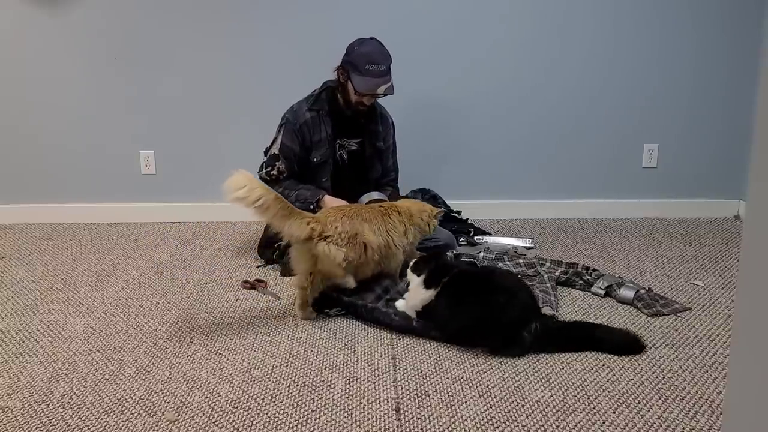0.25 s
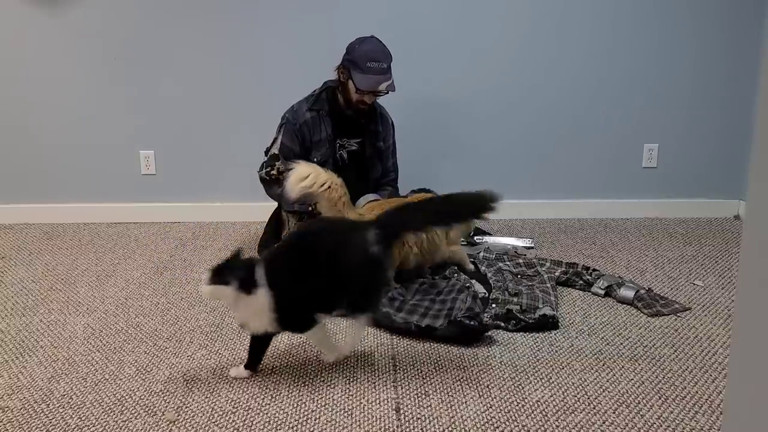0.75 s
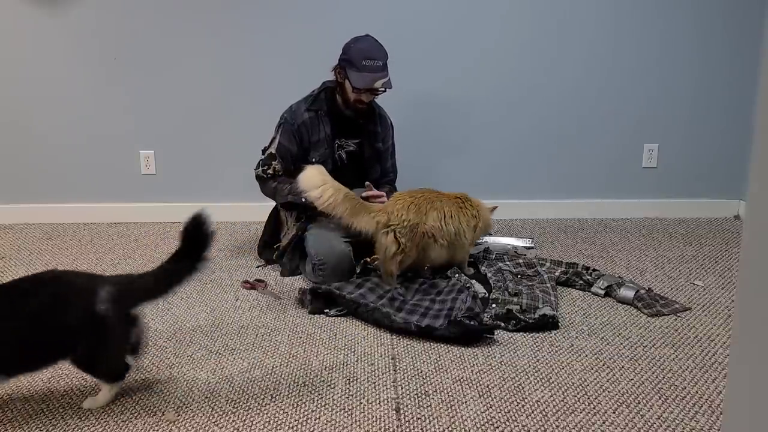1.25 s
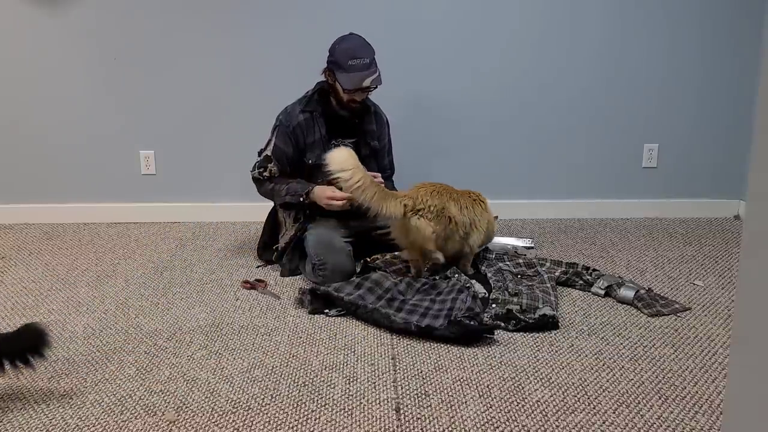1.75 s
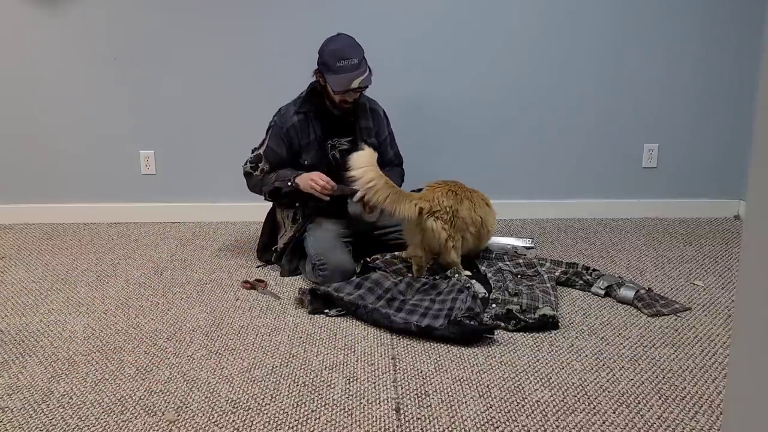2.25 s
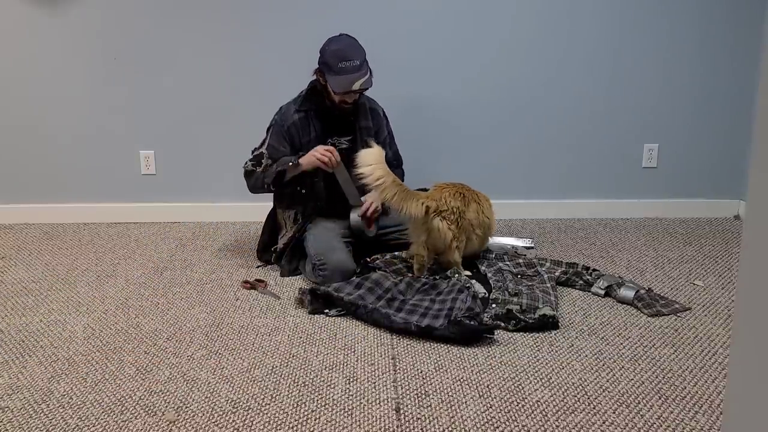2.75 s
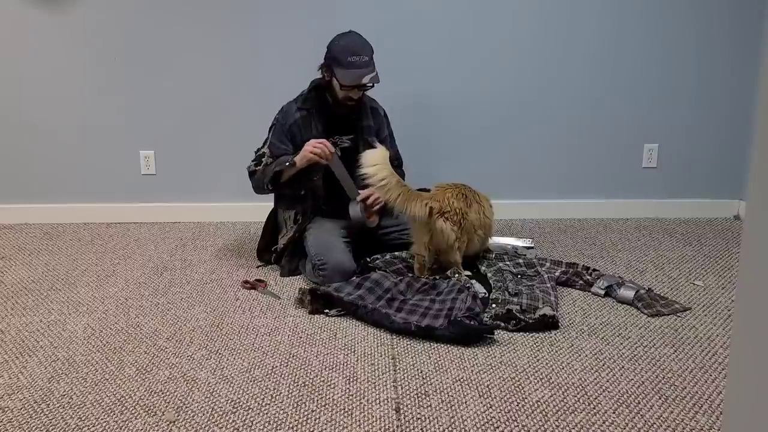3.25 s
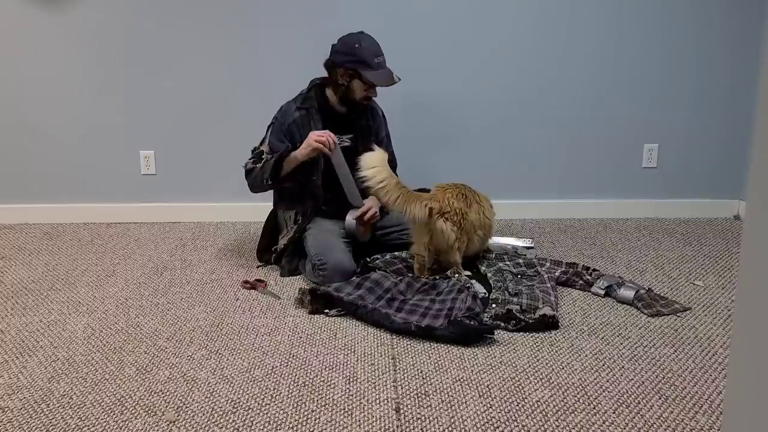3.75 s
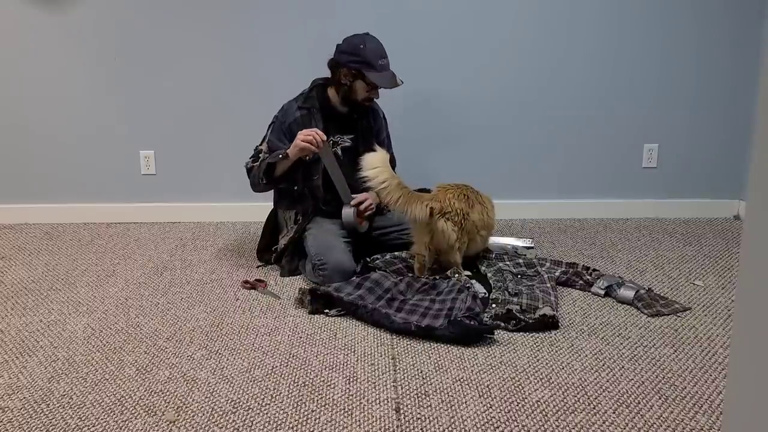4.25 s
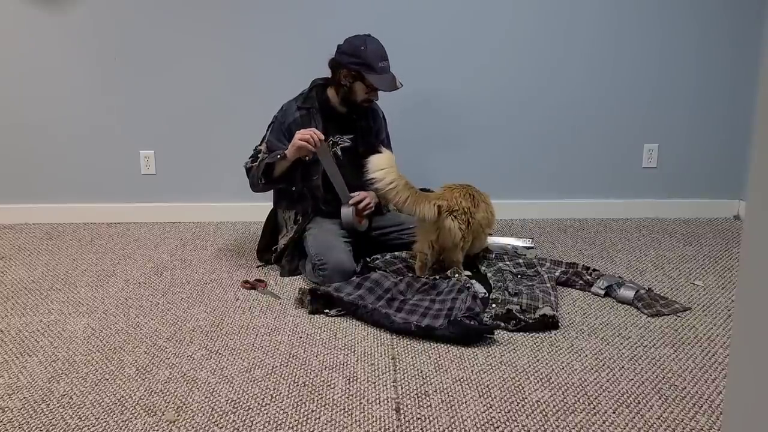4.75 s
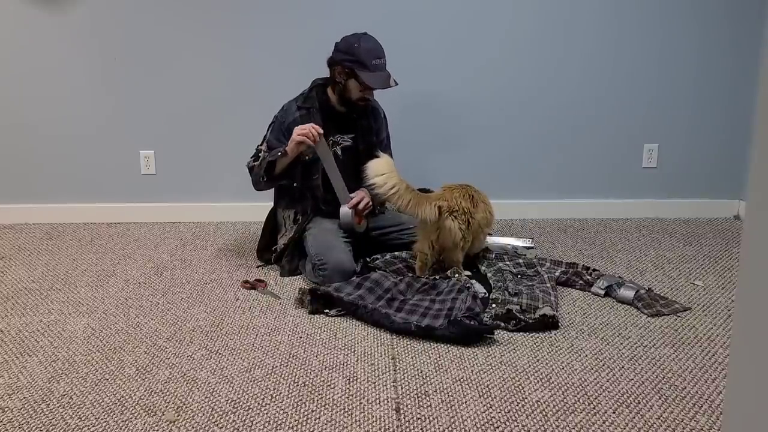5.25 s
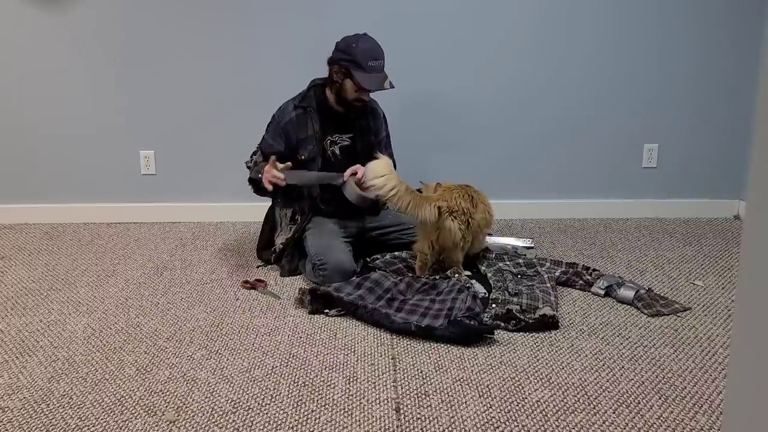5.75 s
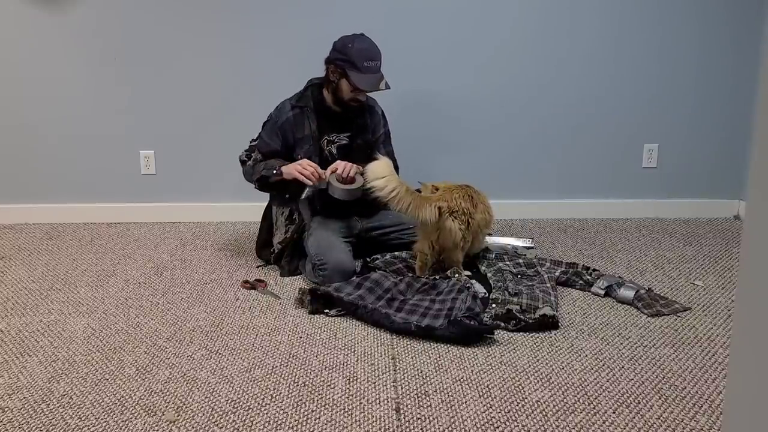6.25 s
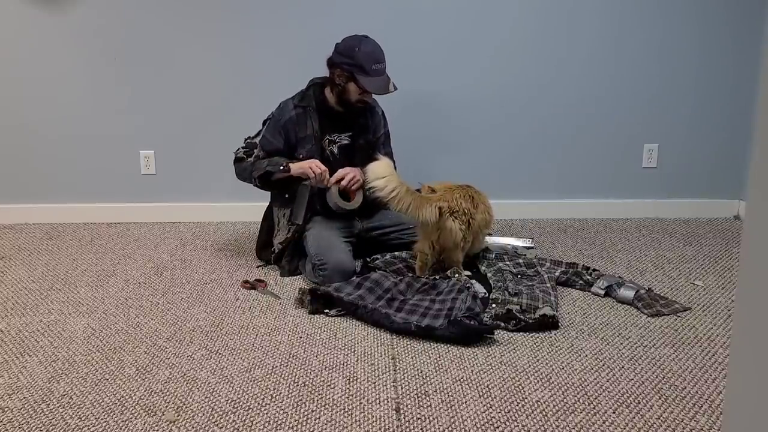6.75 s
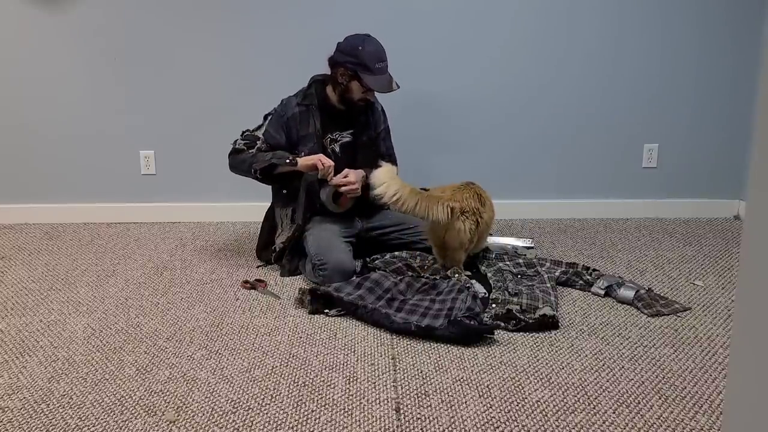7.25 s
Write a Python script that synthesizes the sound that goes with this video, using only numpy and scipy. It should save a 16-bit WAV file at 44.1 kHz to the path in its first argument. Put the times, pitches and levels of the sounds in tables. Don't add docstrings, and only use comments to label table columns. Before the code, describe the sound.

A roll of sticky cloth tape is worked loose a few metres from a stereo microphone in a small carpeted room. One loud snap comes early, then clusters of ticks, short low buzzes and drumming of the strip, another hard snap, a long quiet stretch with faint clicks, and a bright squealing rip at the very end. Mains hum and soft duct air continue beneath.

```python
import sys
import numpy as np
from scipy import signal
from scipy.fft import rfft, irfft, next_fast_len
from scipy.io import wavfile
from scipy.ndimage import uniform_filter1d

SR = 44100
rng = np.random.default_rng(int(sys.argv[2]) if len(sys.argv) > 2 else 0)


def attenuation_scalar(level_db):
    decades = np.asarray(level_db, float) / 20
    return 10 ** decades


def master(y):
    cut = np.clip(np.atleast_2d(y).T, -1, 1)
    pcm = np.round(cut * 32767)
    wavfile.write(sys.argv[1], SR, pcm.astype(np.int16))


N = 330109
T = np.arange(N) / SR
FFT_LEN = next_fast_len(N + N % 2, True)
FFT_HZ = np.maximum(np.fft.rfftfreq(FFT_LEN, 1 / SR), 1)


def on_log(table, hz, col=1):
    table = np.array(table, float)
    return np.interp(np.log(hz), np.log(table[:, 0]), table[:, col])


def ring(x, hz, width_hz):
    return signal.lfilter(*signal.iirpeak(hz, hz / width_hz, fs=SR), x)


def walk(rate_hz):
    hold = int(SR / rate_hz)
    steps = np.repeat(rng.standard_normal(N // hold + 1), hold)
    drift = uniform_filter1d(uniform_filter1d(steps, hold), hold)[:N]
    return drift / drift.std()


def bumps(rows):
    return sum(db * np.exp(-((T - s) / half_s) ** 4) for s, db, half_s in rows)


def pull(t, swell_s, fade_s):
    return np.where(t < swell_s, np.abs(t / swell_s) ** 1.3, np.exp(-(t - swell_s) / fade_s))


def diffuse(count):
    hz = np.fft.rfftfreq(count, 1 / SR)
    alike = .97 * np.exp(-(hz / 607) ** 2)
    mid, side = rfft(rng.standard_normal((2, count))) * np.sqrt([(1 + alike) / 2, (1 - alike) / 2])
    return np.array([mid + side, mid - side])


# frequency in Hz, density in dB per Hz.
AIR_SPECTRUM = [(25, -28), (50, 0.5), (70, 3), (160, 2), (300, -5.5), (800, -11.5), (950, -14), (1300, -12),
                (2200, -19), (3200, -18.5), (4500, -27.5), (5300, -34.5), (8000, -42.5), (16000, -38.5)]
# frequency in Hz, width in Hz, rise in dB.
DUCT_RINGS = [(210, 48, -8), (278, 31, 4), (499, 29, 4), (755.6, 32, 10.5), (7000, 1800, 5)]


def air():
    level_db = -59
    rings_db = sum(db / (1 + (2 * (FFT_HZ - hz) / width_hz) ** 2) for hz, width_hz, db in DUCT_RINGS)
    noise = diffuse(FFT_LEN) * attenuation_scalar(on_log(AIR_SPECTRUM, FFT_HZ) + rings_db)
    swell, out = walk(1.0), 0
    for lo_hz, hi_hz in [(0, 250), (250, 700), (700, 2500), (2500, SR)]:
        band = irfft(noise * ((FFT_HZ >= lo_hz) & (FFT_HZ < hi_hz)), FFT_LEN)[:, :N]
        out = out + band * attenuation_scalar(.5 * swell + 0.5 * walk(3.94))
    return out * attenuation_scalar(level_db) / out.std()


# centre in seconds, depth in dB, half length in seconds.
HUM_DIPS = [
    (2.73, -14, .03),
    (3.81, -6, .05),
    (5.77, -2, 0.025),
]


def hum():
    level_db, waver_db, mains_hz = -57, .5, 119.95
    return attenuation_scalar(level_db + waver_db * walk(3.01) + bumps(HUM_DIPS)) * np.sin(2 * np.pi * mains_hz * T)


# centre in seconds, rise in dB, half length in seconds.
DUCT_SWELLS = [
    (0, 8, 0.35),
    (1.65, 13, .33),
    (4.16, 15, .08),
    (7.25, 15, 0.21),
]


def duct():
    level_db, tone_hz, wander_hz = -78.5, 353, 2.44
    phase = 2 * np.pi * np.cumsum(tone_hz + wander_hz * walk(6)) / SR
    return attenuation_scalar(level_db + bumps(DUCT_SWELLS)) * np.sin(phase)


# frequency in Hz, level in dB.
WHINE = [(14196, -99)]


def whine():
    hz, db = WHINE[0]
    port_phase = np.array([[0], [1.3]])
    return attenuation_scalar(db + 3.0 + .7 * walk(22)) * np.sin(2 * np.pi * hz * T + port_phase)


# centre in seconds, peak in dB, frequency in Hz, swell in seconds.
THUDS = [
    (2.74, -49, 75, 0.017),
    (3.76, -48, 81.5, 0.025),
    (4.22, -60, 70, .05),
    (2.76, -50.5, 200, 0.029),
    (2.84, -55, 177, .04),
    (3.1, -52.5, 191, 0.061),
    (3.8, -53, 241, 0.072),
    (4.08, -61.5, 230, 0.043),
    (5.22, -65, 268, .08),
]


def thuds():
    out = np.zeros(N)
    for s, db, hz, swell_s in THUDS:
        out += attenuation_scalar(db) * np.exp(-((T - s) / swell_s) ** 2) * np.sin(2 * np.pi * hz * (T - s))
    return out


# delay in ms, left level in dB, right level in dB, right lag in ms.
ECHOES = [(0, 0, 0, .09), (1.2, -14, -5, .1), (5.9, -6, -4, .3), (8.6, -11, -11, -.3), (13.2, -8, -1, .1),
          (15.5, -9, -9, -.4), (19.5, -7, -7, .2), (26.5, -10, -9, -.2), (32, -12, -9, .3)]
# frequency in Hz, level in dB, 60 dB decay time in seconds.
ROOM_TAIL = [(100, -34, .4), (220, -31, .38), (400, -23, .38), (800, -25, .3), (1600, -26, .3),
             (3200, -27, .27), (6400, -32, .24), (12800, -29.5, .22)]


def room(count=30000):
    echo_top_hz = 9300
    t, hz = T[:count], np.maximum(np.fft.rfftfreq(count, 1 / SR), 1)
    noise, out = diffuse(count), np.zeros((2, count))
    centres_hz = np.array(ROOM_TAIL)[:, 0]
    for k, (_, db, t60_s) in enumerate(ROOM_TAIL):
        share = on_log(np.c_[centres_hz, np.arange(len(ROOM_TAIL)) == k], hz)
        out += irfft(noise * share, count) * attenuation_scalar(db - 60 * t / t60_s)
    out *= np.clip((t - .004) / .018, 0, 1)
    for ms, left_db, right_db, lag_ms in ECHOES:
        soft = 1 / (1 + 1j * (ms > 0) * hz / echo_top_hz)
        delay = np.exp(-2j * np.pi * hz * np.array([[ms], [ms + lag_ms]]) / 1000)
        out += irfft(attenuation_scalar(np.array([[left_db], [right_db]])) * soft * delay, count)
    return out[:, :count - count // 10]


# start in seconds, swell in seconds, fade in seconds, level in dB, slip rate in Hz.
SQUEALS = [
    (7.448, 0.039, .02, -31, 1410),
    (5.865, .025, .015, -62, 1440),
]


def squeals(count=7):
    db_per_oct, rough = -5, .045
    out = np.zeros(N)
    for s, swell_s, fade_s, db, hz in SQUEALS:
        phase = 2 * np.pi * np.cumsum(hz * (1 + rough * walk(200))) / SR
        wave = np.zeros(N)
        for k in range(1, count + 1):
            wave += attenuation_scalar(db_per_oct * np.log2(k) + 1.6 * walk(150)) * np.sin(k * phase)
        out += attenuation_scalar(db) * (T > s) * pull(np.maximum(T - s, 0), swell_s, fade_s) ** 2 * wave
    return out


# time in seconds, slip rate in Hz, level in dB.
BUZZES = [
    [(2.724, 1116, -60), (2.735, 1144, -30), (2.742, 1145, -31.5), (2.75, 1120, -67)],
    [(2.99, 270, -60), (3.008, 280, -35), (3.024, 320, -31), (3.042, 410, -25), (3.054, 420, -30),
     (3.066, 429, -45), (3.078, 454, -36), (3.09, 460, -69)],
]


def buzzes(rough=.09):
    out = np.zeros(N)
    for rows in BUZZES:
        s, hz, db = np.transpose(rows)
        phase = 2 * np.pi * np.cumsum(np.interp(T, s, hz) * (1 + rough * walk(160))) / SR
        wave = np.sin(phase) + attenuation_scalar(-17) * np.sin(2 * phase) + attenuation_scalar(-25) * np.sin(3 * phase)
        out += attenuation_scalar(np.interp(T, s, db, -140, -140) + 1.5 * walk(120)) * wave
    return out


def glue_threads():
    strength = attenuation_scalar(4 * np.minimum(rng.exponential(size=N), 2.7))
    threads = rng.standard_normal(N) * strength * (rng.random(N) < .12)
    threads *= attenuation_scalar(2 * walk(250))
    return threads / threads.std()


def add_tear(out, threads, s, swell_s, fade_s, hz, click_db, ring_db):
    part = slice(int(s * SR), min(int((s + .4) * SR), N))
    tear = threads[part] * pull(T[part] - s, swell_s, fade_s)
    clicks = signal.lfilter(*signal.butter(1, 1200, "high", fs=SR), tear)
    shaken = ring(ring(tear, hz, 0.94 * hz), hz, 0.94 * hz)
    out[part] += attenuation_scalar(click_db) * clicks + 3 * attenuation_scalar(ring_db) * shaken


# start in seconds, swell in seconds, fade in seconds, level in dB, ring in Hz.
DRUMS = [(2.206, .007, .022, -37, 950), (2.70, .03, 0.04, -47, 1700), (2.722, .017, 0.013, -30, 290),
         (2.734, .023, .015, -39, 800), (3.03, .024, 0.015, -56, 1200), (.933, .004, .02, -21, 400),
         (3.727, .012, .025, -35, 800), (5.865, .027, .018, -52, 1350), (2.02, .012, 0.047, -60, 1710),
         (2.74, .025, 0.023, -35, 210), (3.0, .025, .035, -27, 250), (3.73, .02, .06, -31, 210),
         (6.521, .009, .018, -58, 1900), (6.522, 0.0072, 0.016, -71, 3500),
         (7.178, 0.0086, 0.018, -66, 3450), (7.455, .035, .02, -32, 1500), (7.458, .032, .02, -31, 2500),
         (7.458, 0.031, .02, -37, 5500), (.5, .008, .015, -58, 1600)]


def drums(threads):
    out = np.zeros(N)
    for s, swell_s, fade_s, db, hz in DRUMS:
        add_tear(out, threads, s, swell_s, fade_s, hz, click_db=db - 45, ring_db=db)
    return out


# start in seconds, swell in seconds, fade in seconds, click in dB, strip ring in Hz.
PEELS = [(.496, 0.0077, .014, -50, 11000), (.645, .016, .015, -76, 7000), (.916, .018, .0027, -57, 2270),
         (1.615, 0.016, .019, -67.5, 5050), (2.005, .021, 0.024, -50, 5530), (2.08, 0.021, .03, -63, 2000),
         (2.301, .0091, 0.02, -65.5, 2800), (2.368, 0.014, 0.019, -63.5, 3220),
         (2.54, 0.0063, .024, -73, 6000), (2.70, .051, .011, -51.5, 2830), (2.78, .03, 0.086, -71, 2700),
         (2.934, 0.021, .017, -68, 1990), (3.0, 0.066, .027, -80, 4500), (3.726, .012, .03, -47.5, 3300),
         (3.79, 0.04, 0.085, -77, 2960), (3.93, 0.012, .035, -73, 4400), (4.01, 0.017, .037, -70.5, 3920),
         (5.792, 0.016, 0.037, -62, 1520), (5.862, 0.024, .018, -58, 4500),
         (6.335, .035, 0.013, -72.5, 2600), (6.521, 0.008, .018, -75, 4500), (7.178, .006, .022, -75, 2500),
         (7.425, 0.031, .02, -60.5, 5860), (7.455, 0.03, .012, -36, 6000)]


def peels(threads):
    ring_over_click_db, db_per_oct, pivot_hz = 3, -9, 2600
    out = np.zeros(N)
    for s, swell_s, fade_s, click_db, hz in PEELS:
        ring_db = click_db + ring_over_click_db + db_per_oct * np.log2(hz / pivot_hz)
        add_tear(out, threads, s, swell_s, fade_s, hz, click_db, ring_db)
    return out


# frequency in Hz, decay in ms, level in dB.
ROLL_MODES = [(420, 2.94, -3), (620, 2.1, -0.5), (790, 2.3, -4.5)]


def add_release(out, s, db, hz, crack_db, body_db, cycles):
    t, rise_ms, crack_s = T[:600], .1, .0004
    decay = np.exp(-t * hz / cycles)
    kick = -1.4 * np.sin(2 * np.pi * hz * t) * decay * (1 - np.exp(-t * 1000 / rise_ms))
    grit = np.sign(rng.standard_normal(len(t)))
    crack = attenuation_scalar(crack_db) * grit * t / crack_s * np.exp(-t / crack_s)
    body = np.zeros(len(t))
    for mode_hz, decay_ms, mode_db in ROLL_MODES:
        body -= attenuation_scalar(body_db + mode_db) * np.sin(2 * np.pi * mode_hz * t) * np.exp(-t * 1000 / decay_ms)
    start = int(s * SR)
    out[start:start + len(t)] += attenuation_scalar(db) * (kick + crack + body)


# start in seconds, peak in dB, strip ring in Hz, crack in dB.
TICKS = [(0.5062, -45, 1500, 6), (2.0222, -38, 5500, 13), (2.122, -44, 2180, -3), (2.189, -44.5, 2500, 1),
         (2.2, -52, 4500, 6), (2.308, -51, 6600, -7), (2.371, -50, 6300, -3), (2.6918, -27.5, 1750, -4.5),
         (5.8045, -42, 5800, -13), (6.519, -43, 1980, -10), (7.1772, -43, 3440, -4)]


def ticks():
    out = np.zeros(N + 600)
    for s, db, hz, crack_db in TICKS:
        add_release(out, s, db, hz, crack_db, body_db=-37, cycles=0.93)
    return out[:N]


# start in seconds, peak in dB, strip ring in Hz, crack in dB, roll body in dB.
SNAPS = [
    (.9325, -10.5, 1224, -28, -3.5),
    (2.1955, -37, 1300, -26, -14),
    (2.2038, -24, 1290, -30, -6),
    (3.7252, -18.5, 1480, -15.5, -15.5),
    (5.885, -36.5, 1250, -9, -36),
    (2.7695, -34, 1000, -20, -12),
    (.558, -56, 400, -30, 1),
    (2.955, -57, 740, -12, 2),
]


def snaps():
    out = np.zeros(N + 600)
    for s, db, hz, crack_db, body_db in SNAPS:
        add_release(out, s, db, hz, crack_db, body_db, cycles=0.98)
    return out[:N]


def tape_colour(tape):
    tape = signal.sosfilt(signal.butter(3, 240, "high", fs=SR, output="sos"), tape)
    upper_mids = 0.92 * ring(tape, 5440, 3940)
    dip = 0.32 * ring(tape, 10500, 2500)
    sparkle = attenuation_scalar(-2) * ring(tape, 14800, 3900)
    return tape + upper_mids - dip + sparkle


def scene():
    background = air() + np.sqrt(2) * (hum() + duct() + whine())
    buzz, buzz_room = buzzes(), attenuation_scalar(-8)
    threads = glue_threads()
    tape = squeals() + buzz_room * buzz + drums(threads) + peels(threads) + ticks() + snaps()
    in_room = signal.fftconvolve(tape_colour(tape)[None], room(), axes=1)[:, :N]
    return in_room + (1 - buzz_room) * buzz + thuds() + background


# frequency in Hz, left minus right in dB.
PORTS = [(60, 3.5), (110, -1.5), (200, -4.5), (380, -1.0), (700, 0.5), (1290, -6.5), (2380, 1.5), (4400, 8),
         (8120, 1.5), (15000, -1.5)]


def roll_off(x):
    return signal.sosfilt(signal.butter(12, 16810, fs=SR, output="sos"), x)


def record(dry):
    tilt_db = on_log(PORTS, FFT_HZ) / 2
    top = 1 / (1 + (FFT_HZ / 15900) ** 60)
    ports = attenuation_scalar(np.array([tilt_db, -tilt_db]))
    mix = irfft(rfft(dry, FFT_LEN) * top * ports, FFT_LEN)[:, :N]
    return roll_off(mix)


dry = scene()
out = record(dry)
master(out)
```